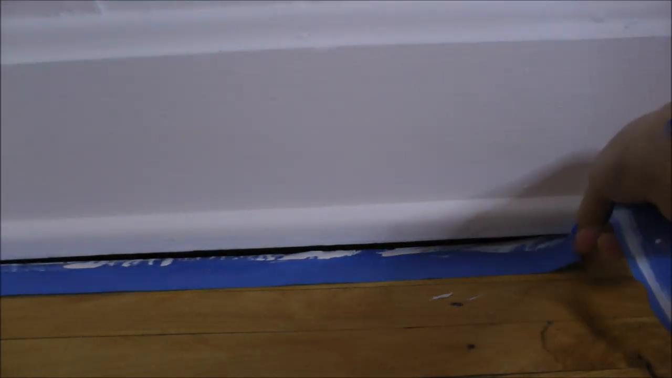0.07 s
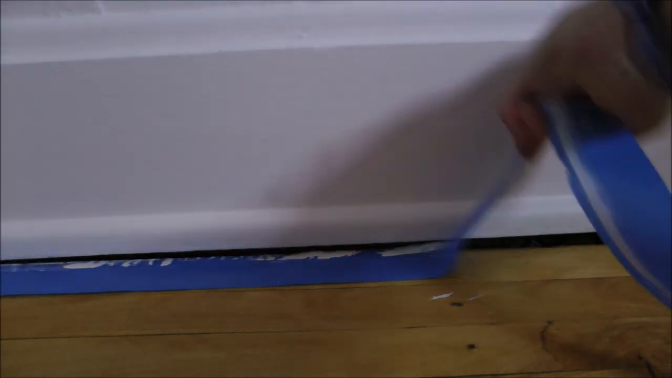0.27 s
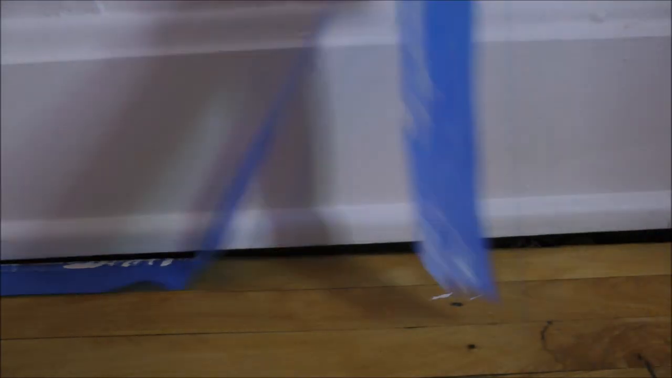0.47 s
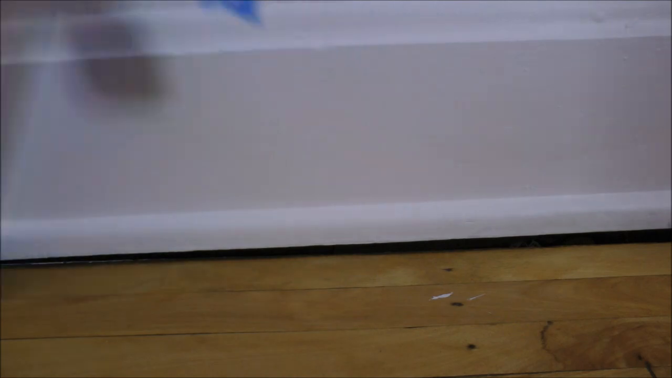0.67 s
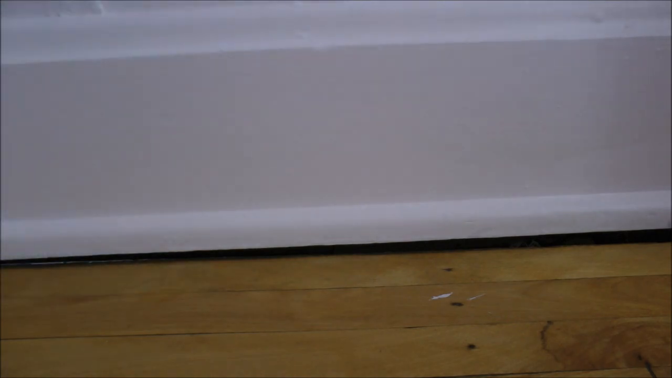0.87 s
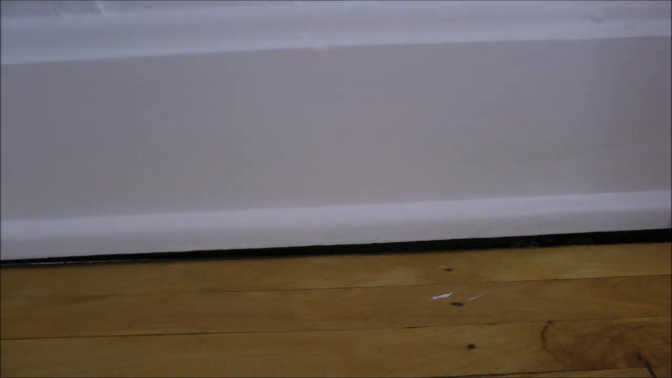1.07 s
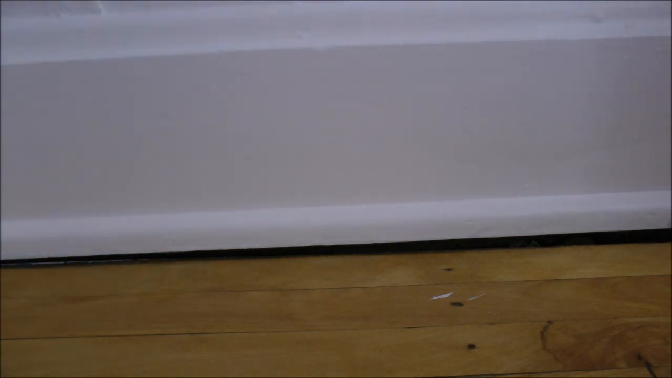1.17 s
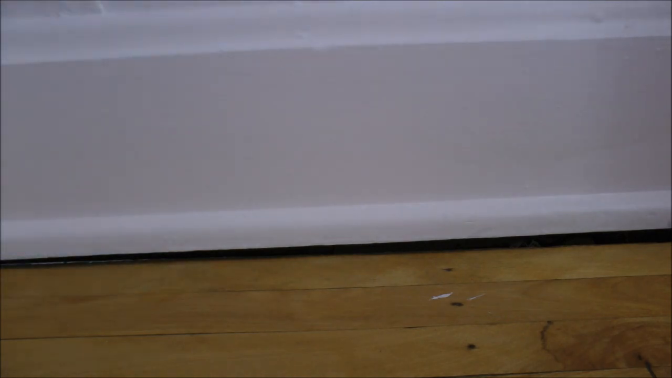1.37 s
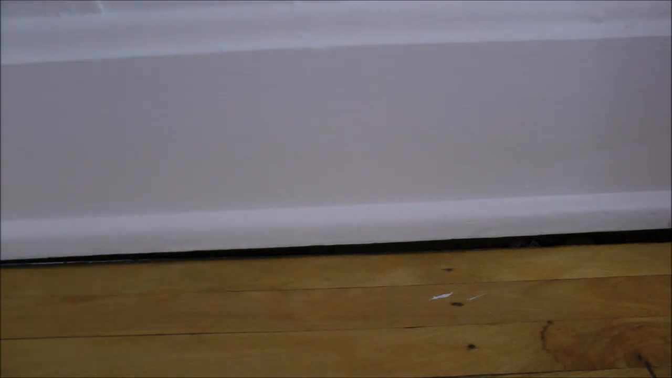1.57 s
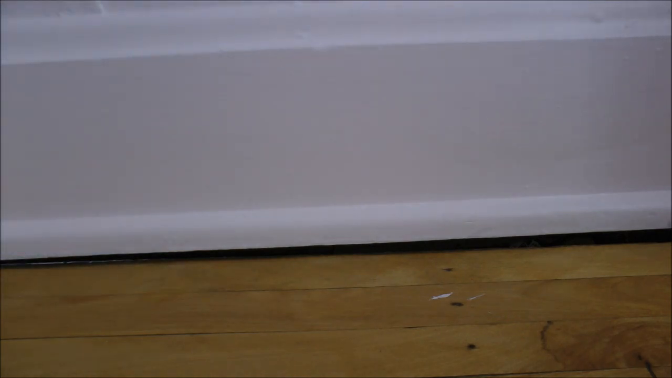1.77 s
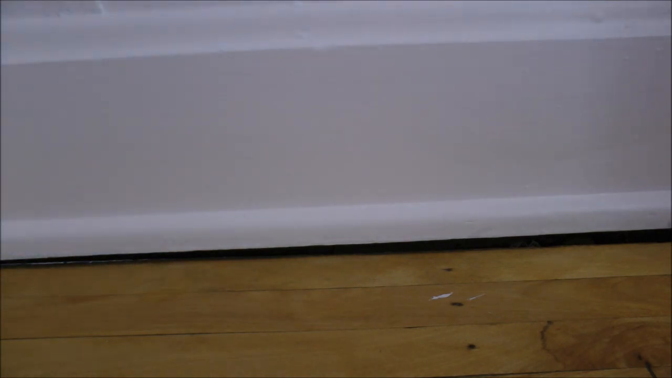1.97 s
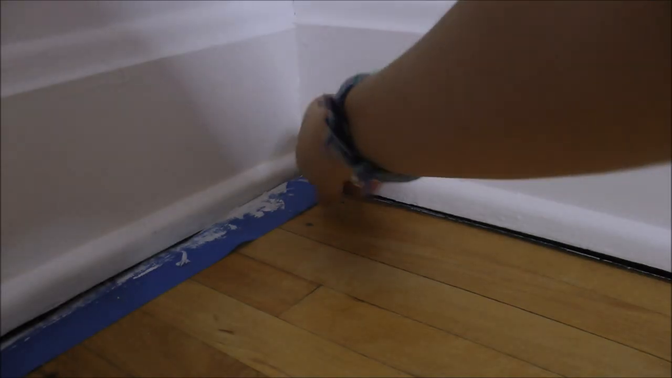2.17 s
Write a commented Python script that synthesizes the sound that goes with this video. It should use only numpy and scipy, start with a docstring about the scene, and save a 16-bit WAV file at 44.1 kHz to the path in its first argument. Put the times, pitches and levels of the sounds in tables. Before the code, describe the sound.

Close stereo pickup of adhesive tape tearing from floorboards in a quiet, slightly echoing room; a long harsh pull, a gap, a quick rip with a woody knock, then light settling ticks and rustle.

```python
"""Loose tape rustles and ticks, then painter's tape is peeled off a hardwood floor along a skirting board.
Thousands of tiny glue snaps excite resonances of the taut strip and the wood: a long pull, a pause, a sharp rip.
Larger catches and creases are band-limited noise bursts; knocks on the boards are decaying sines.
The loose tape settles and crinkles, the sound drops out for an instant, and a soft rustle follows.
Diffuse echoes give the small bare room, over a quiet hush and a low rumble."""
import sys
import numpy as np
from scipy import signal
from scipy.fft import rfft, irfft, next_fast_len
from scipy.io import wavfile
from scipy.ndimage import uniform_filter1d, map_coordinates

SR = 44100
rng = np.random.default_rng(int(sys.argv[2]) if len(sys.argv) > 2 else 0)


def digitize_waveform(pressure):
    """Quantize a signal to 16-bit integers and store it at the path in sys.argv[1].

    Rows of a 2-D input are taken as channels; values are limited to [-1, 1].
    """
    field = np.atleast_2d(pressure).T
    bounded = np.clip(field, -1, 1)
    quanta = np.round(bounded * 32767).astype(np.int16)
    wavfile.write(sys.argv[1], SR, quanta)


N = 97020  # samples, 2.2 s

# Stereo width of hush and echo. Each row: frequency in Hz, gain of side over mid in dB.
SIDE_WIDTH = [(60, -5.5), (150, -5.5), (300, -5.5), (1000, -13), (2500, -15), (5000, -17.5), (8500, -15.5),
              (10500, -46), (15000, -42)]


def amp(db):
    """Level law: decibels to amplitude gain."""
    return 10 ** (np.asarray(db) / 20)


def unit(x):
    """Power normalisation: scale to rms 1."""
    return x / np.sqrt(np.mean(x ** 2) + 1e-20)


def along(points, hz):
    """Logarithmic frequency scale: interpolate (Hz, value) points along it."""
    f, v = np.transpose(points)
    return np.interp(np.log(hz + 1), np.log(f + 1), v)


def clock():
    """Uniform sampling: the time of every sample in seconds."""
    return np.arange(N) / SR


def level(rows):
    """Amplitude envelope: gain along a (s, dB) curve, practically silent outside it."""
    s, db = np.transpose(rows)
    return amp(np.interp(clock(), s, db, left=-140, right=-140))


def wobble(rate):
    """Slow random modulation: a smooth curve through rate random knots a second."""
    knots = rng.standard_normal(N // 20)
    return map_coordinates(knots, [clock() * rate], mode="wrap")


def filtered(x, response):
    """Linear filtering: multiply the spectrum of x by a response of frequency."""
    padded = next_fast_len(N + SR // 2)
    hz = np.fft.rfftfreq(padded, 1 / SR)
    return irfft(rfft(x, padded) * response(hz), padded)[..., :N]


def coloured(x, spectrum, size=2048):
    """Minimum-phase filtering: fold the cepstrum to make the spectrum causal; result at rms 1."""
    magnitude = amp(along(spectrum, np.fft.rfftfreq(size, 1 / SR)))
    cepstrum = irfft(np.log(magnitude))
    cepstrum[1:size // 2] *= 2
    cepstrum[size // 2 + 1:] = 0
    impulse_response = irfft(np.exp(rfft(cepstrum)))
    return unit(signal.fftconvolve(x, impulse_response)[:N])


def resonance(f, hz, width):
    """Damped oscillator: response of one mode at hz with half-power bandwidth width."""
    return 1j * f * width / (hz * hz - f * f + 1j * f * width)


def snaps(per_s, scatter_db, clump_db, clump_rate):
    """Stick-slip: tiny impulses at random moments, uneven in size and bunched in strength."""
    hit = rng.random(N) < per_s / SR
    scatter = scatter_db * np.clip(rng.standard_normal(N), -2, 2)
    clumping = clump_db * np.clip(wobble(clump_rate), -2, 2)
    polarity = rng.choice([-1, 1], N)
    return unit(hit * amp(scatter + clumping) * polarity)


def patchy(x, patchy_db, size=256):
    """Shifting resonances: random gains in time and frequency as strip length and tension change."""
    z = signal.stft(x, nperseg=size)[2]
    field = uniform_filter1d(rng.standard_normal(z.shape), size=4, axis=0)  # smooth over frequency
    field = uniform_filter1d(field, size=9, axis=1)  # smooth over time
    return unit(signal.istft(z * amp(patchy_db * unit(field)), nperseg=size)[1][:N])


def hush():
    """Stationary random noise: the quiet room's steady background."""
    # Background spectrum. Each row: frequency in Hz, relative density in dB per Hz.
    hush_spectrum = [(15, -32), (25, -10.5), (257, -7), (286, -23), (373, -8), (655, -17), (790, 8.5),
                     (978, -44.5), (2070, -5.5), (15000, -36)]
    mid, side = filtered(rng.standard_normal((2, N)), lambda f: amp(along(hush_spectrum, f)))
    side = filtered(side, lambda f: amp(along(SIDE_WIDTH, f)))
    return amp(-78.5) * unit(np.array([mid + side, mid - side]))


def shifting():
    """Low-passed random noise: the rumble while the person shifts about."""
    # Strength of the rumble. Each row: time in seconds, relative level in dB.
    shift_levels = [(0, -67), (.1, -72), (.2, -71), (.6, -74.5), (.9, -81), (1.05, -91), (1.68, -81),
                    (1.78, -74), (1.95, -77), (2.1, -73), (2.17, -66.5), (2.2, -68)]
    # Rumble spectrum. Each row: frequency in Hz, relative density in dB per Hz.
    rumble_spectrum = [(20, -13.5), (60, -4), (100, 4), (135, 3), (260, -3), (500, -19.5), (1500, -43),
                       (8000, -85)]
    return level(shift_levels) * coloured(rng.standard_normal(N), rumble_spectrum)


def puff():
    """Pressure pulse: one push of air from the flapping strip on the right microphone port."""
    centre_s, width_s, peak_db = 0.366, 0.001, -31.5  # width is the standard deviation
    pulse = np.exp(-((clock() - centre_s) / width_s) ** 2 / 2)
    return np.outer([0, 1], amp(peak_db) * pulse)


def knocks():
    """Free decay of struck modes: tugs on the tape thump the floorboards."""
    # Blows on the boards. Each row: start in seconds, relative level in dB, frequency in Hz,
    # 60 dB decay time in seconds.
    blows = [(0.2654, -31, 427, 0.041), (.268, -37.5, 1074, 0.034), (.281, -44.5, 70, 0.02),
             (.822, -57, 133.5, 0.22), (1.145, -30, 736, 0.042), (1.143, -43.5, 407, 0.023),
             (1.146, -63, 160.4, .9)]
    attack_s = 0.00033
    out = np.zeros(N)
    for s, db, hz, t60 in blows:
        t = np.maximum(clock() - s, 0)
        attack = 1 - np.exp(-t / attack_s)
        out += amp(db - 60 * t / t60) * np.sin(2 * np.pi * hz * t) * attack
    return out


def handling():
    """Random impulse excitation: loose tape rustles in the hand, flaps and settles on the wood."""
    # Rustle in the hand. Each row: time in seconds, relative level in dB.
    handling_levels = [(0, -52), (.06, -56), (.12, -54.5), (.22, -49.5), (.3, -48), (1.4, -73), (1.6, -73),
                       (1.71, -69.5), (1.8, -65), (1.86, -61), (1.915, -56.5), (1.95, -62), (2.07, -66.5),
                       (2.135, -50.5), (2.145, -61), (2.2, -53.5)]
    # Freed strip flapping and settling. Each row: time in seconds, relative level in dB.
    settling_levels = [(1.3, -65.5), (1.335, -50.5), (1.355, -58), (1.372, -47), (1.39, -68), (1.435, -68),
                       (1.447, -64), (1.47, -61.5), (1.5, -79), (1.56, -75.5), (1.6, -88)]
    # Spectra of the rustle and the loose strip. Each row: frequency in Hz, relative density in dB per Hz.
    rustle_spectrum = [(60, -21), (200, -10), (380, 3.5), (520, -5.5), (760, 0.5), (980, -11), (1500, -5.5),
                       (2000, -0.5), (4000, -2), (6500, -5.5), (8500, -14), (16000, -18)]
    loose_spectrum = [(100, -27), (550, -12), (760, 4), (1000, -11), (1600, -16), (2050, -1.5), (3300, -2),
                      (6000, -5), (9000, -26), (16000, -37)]
    crinkle = snaps(per_s=1800, scatter_db=2.5, clump_db=2.0, clump_rate=200)
    rustle = level(handling_levels) * coloured(crinkle, rustle_spectrum)
    return rustle + level(settling_levels) * coloured(crinkle, loose_spectrum)


def cracks(rows, breadth, size=4096):
    """Broad damped resonance: short papery noise bursts, each around its own pitch."""
    out = np.zeros(N + size)
    t = np.arange(size) / SR
    f = np.fft.rfftfreq(size, 1 / SR)
    for s, db, hz, fade in rows:
        noise = rng.choice([-1., 1.], size)
        burst = unit(irfft(rfft(noise) * resonance(f, hz, breadth * hz) ** 2))
        start = max(round(s * SR), 0)
        out[start:][:size] += amp(db - 60 * t / fade) * burst
    return out[:N]


def creases():
    """Buckling: creases of the loose strip pop."""
    # Each row: start in seconds, relative level in dB, centre in Hz, 60 dB fade in seconds.
    pops = [(.127, -47, 7000, 0.0084), (.194, -43.5, 8740, 0.019), (.21, -43, 8000, 0.012),
            (.236, -28.5, 2950, 0.0071), (1.591, -58, 4500, 0.0064), (1.7405, -53, 4300, 0.0077),
            (1.779, -48, 4300, 0.0091), (1.791, -52, 5000, 0.03), (1.8735, -45.5, 5500, .015),
            (1.883, -46.5, 6000, 0.014), (1.896, -41.5, 4000, 0.038), (1.915, -45.5, 4000, 0.05)]
    return cracks(pops, breadth=0.8)


def catches():
    """Sudden release of strain: patches of glue give way at once."""
    # Each row: start in seconds, relative level in dB, centre in Hz, 60 dB fade in seconds.
    patches = [(.008, -44.5, 5500, .01), (.012, -38.5, 5600, 0.025), (.013, -45, 2480, .05),
               (.257, -26, 3300, 0.073), (.2665, -31.5, 5500, 0.09), (.2803, -20.5, 2300, 0.014),
               (.345, -32, 3000, 0.01), (.3625, -24, 2500, 0.0086), (.364, -27.5, 9500, 0.016),
               (.371, -28.5, 2970, 0.037), (.418, -30.5, 3500, 0.043), (.48, -45.5, 4000, 0.016),
               (.533, -32.5, 9000, 0.087), (.56, -27.5, 6500, 0.12), (.583, -25.5, 3950, 0.047),
               (.696, -27, 6900, 0.044), (.7795, -30, 6000, 0.0081), (.8203, -20, 4500, 0.013),
               (.828, -28, 5500, 0.014), (.8675, -23, 9000, 0.022), (.872, -40, 10500, 0.021),
               (.9315, -29.5, 2950, 0.059)]
    return cracks(patches, breadth=0.7)


def board(x):
    """Modal superposition: resonances of the wood under the tape, shaken by the snaps."""
    # Modes of the wood. Each row: frequency in Hz, bandwidth in Hz, relative level in dB.
    modes = [(747.3, 49, 2.5), (807, 58, -5), (1113, 71, -9.5), (1443, 90, -10.5)]
    return unit(filtered(x, lambda f: sum(amp(db) * resonance(f, hz, w) for hz, w, db in modes)))


def last_rip():
    """Forced vibration by stick-slip: a jerk frees the end of the strip and rattles the wood."""
    # Strength of the rip. Each row: time in seconds, relative level in dB.
    rip_levels = [(1.142, -41.5), (1.146, -27.5), (1.18, -28), (1.212, -28), (1.224, -35), (1.262, -31.5),
                  (1.285, -62), (1.33, -56)]
    # Spectrum of the rip. Each row: frequency in Hz, relative density in dB per Hz.
    rip_spectrum = [(60, -28), (250, -16), (550, -22.5), (1000, -22), (1450, -4), (1900, -2.5), (3000, -3),
                    (4000, 3.5), (6500, 2.5), (8500, -5.5), (11000, -7), (16000, -13.5)]
    glue = snaps(per_s=7000, scatter_db=3.5, clump_db=2.0, clump_rate=600)
    glue = patchy(glue, patchy_db=2)
    wood = amp(-14) * board(glue)
    return level(rip_levels) * (coloured(glue, rip_spectrum) + wood)


def long_pull():
    """Stick-slip on a lengthening strip: the glue tears along the floor and the sound thins."""
    # Strength of the pull. Each row: time in seconds, relative level in dB.
    pull_levels = [(.12, -65), (.228, -51.5), (.24, -37.5), (.266, -32.5), (.295, -40.5), (.335, -33),
                   (.37, -33.5), (.425, -36), (.47, -32.5), (.49, -35.5), (.58, -33.5), (.625, -39),
                   (.68, -32.5), (.75, -33.5), (.825, -31.5), (.855, -35), (.885, -32), (.905, -42.5),
                   (.942, -38.5), (.955, -49)]
    # How strongly the pull shakes the wood. Each row: time in seconds, level in dB relative to the strip.
    board_levels = [(.25, -25.5), (.5, -21.5), (.62, -27), (.76, -29.5), (.84, -21.5), (.91, -12),
                    (.95, -12)]
    # Spectra of the short and long free strip. Each row: frequency in Hz, relative density in dB per Hz.
    short_spectrum = [(60, -10.5), (200, -13), (400, -15.5), (560, -14.5), (1000, -16), (1450, -9.5),
                      (1800, 3.5), (3300, -2), (6500, 1.5), (8500, -5), (11000, -6.5), (16000, -12.5)]
    long_spectrum = [(60, -41.5), (200, -29.5), (400, -12), (520, -27.5), (1000, -15.5), (1500, -12.5),
                     (1850, -3.5), (3200, -1.5), (5200, 3), (6800, 0.5), (8500, -4.5), (11000, -7.5),
                     (16000, -12.5)]
    glue = snaps(per_s=5000, scatter_db=4.0, clump_db=1.4, clump_rate=290)
    glue = patchy(glue, patchy_db=2.2)
    grown = np.interp(clock(), [0.46, 0.47], [0, 1])  # short to long, in seconds
    strip = (1 - grown) * coloured(glue, short_spectrum) + grown * coloured(glue, long_spectrum)
    shaking = amp(np.interp(clock(), *np.transpose(board_levels)))
    return level(pull_levels) * (strip + shaking * board(glue))


def echo(x):
    """Diffuse reverberation: one decaying-noise answer of the room, as mid and side."""
    # Reverberation of the room. Each row: frequency in Hz, 60 dB decay time in seconds.
    decay_times = [(150, 0.64), (530, 0.31), (1400, 0.52), (3700, 0.39), (9700, 0.36), (16000, 0.24)]
    wall_delay_s = 0.0025
    hz, t, z = signal.stft(rng.standard_normal((2, SR)), SR, nperseg=256)
    decay = amp(-60 * t / along(decay_times, hz)[:, None])
    tail = signal.istft(z * decay, SR, nperseg=256)[1]
    tail = tail * (np.arange(tail.shape[1]) / SR > wall_delay_s)
    return signal.fftconvolve(x[None], tail / np.linalg.norm(tail[0]), axes=1)[:, :N]


def room(x, count=10, size=1024):
    """Superposed paths: direct sound, near reflections and diffuse echoes redrawn in equal spans of time."""
    near_fade_s, near_db, wet_db = 0.0099, -1, -4
    span = np.arange(N) * count // N  # each span has its own random echo
    mid, side = amp(wet_db) * sum(echo(x * (span == k)) for k in range(count))
    # floor and skirting reflect unequally to the two ports
    near = rng.standard_normal(size) * amp(-60 * np.arange(size) / SR / near_fade_s)
    side = side + amp(near_db) * signal.fftconvolve(x, near / np.linalg.norm(near))[:N]
    side = filtered(side, lambda f: amp(along(SIDE_WIDTH, f)))
    return np.array([x + mid + side, x + mid - side])


def scene():
    """Linear superposition: tape and wood in the room, with the puff and the hush added."""
    tape = handling() + creases() + catches() + last_rip() + long_pull()
    return room(amp(-2.5) * (tape + shifting() + knocks())) + puff() + hush()


def record(dry):
    """Gating and band limiting: a brief dropout near the end, and nothing kept above the band limit."""
    dropout_start_s, dropout_end_s, top_hz = 2.0745, 2.1415, 15950
    muted = (clock() > dropout_start_s) & (clock() < dropout_end_s)
    gain = uniform_filter1d(np.where(muted, amp(-35), 1.), size=64)  # softened edges
    return filtered(dry * gain, lambda f: f < top_hz)


dry = scene()
out = record(dry)
digitize_waveform(out)
```